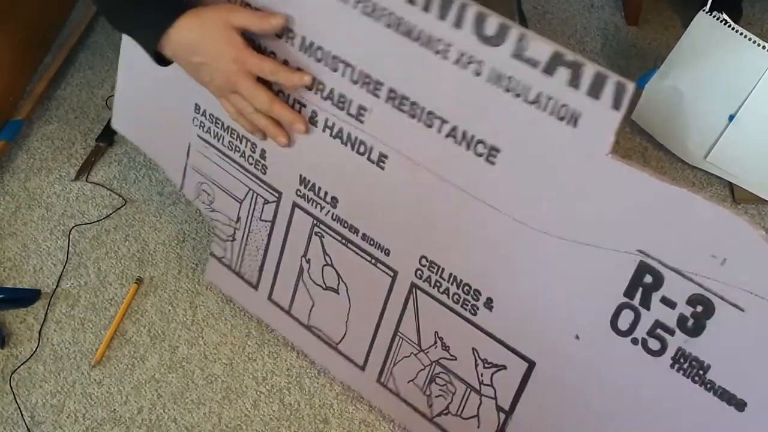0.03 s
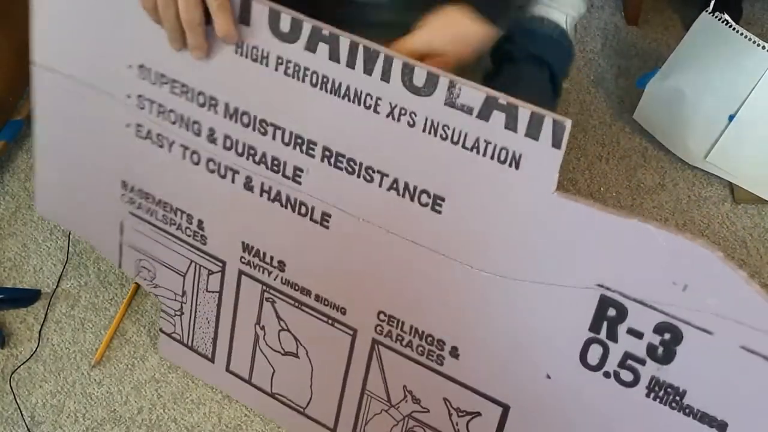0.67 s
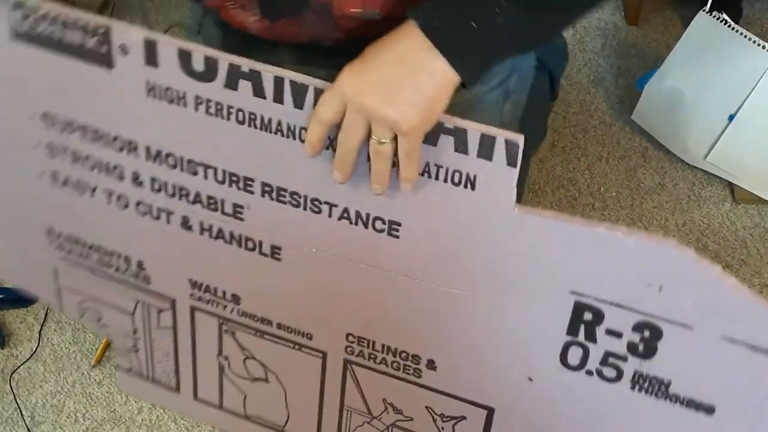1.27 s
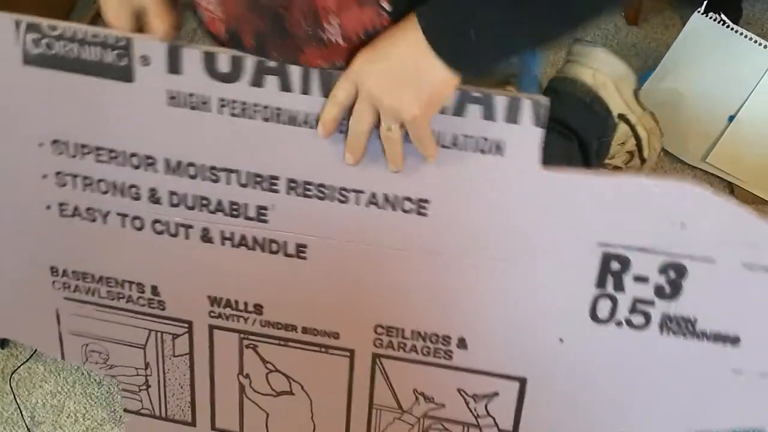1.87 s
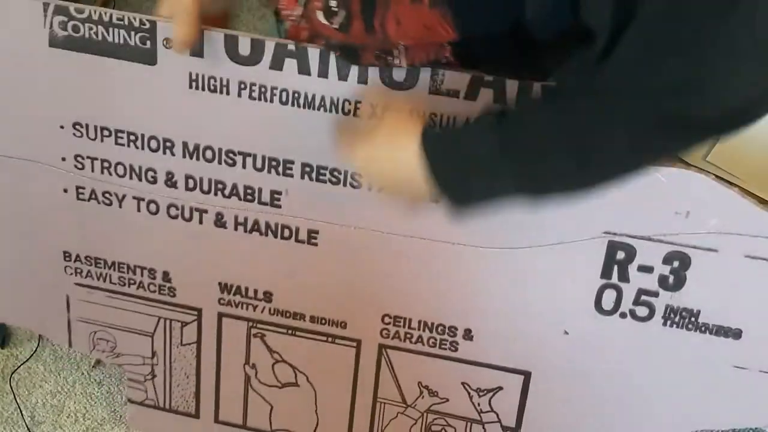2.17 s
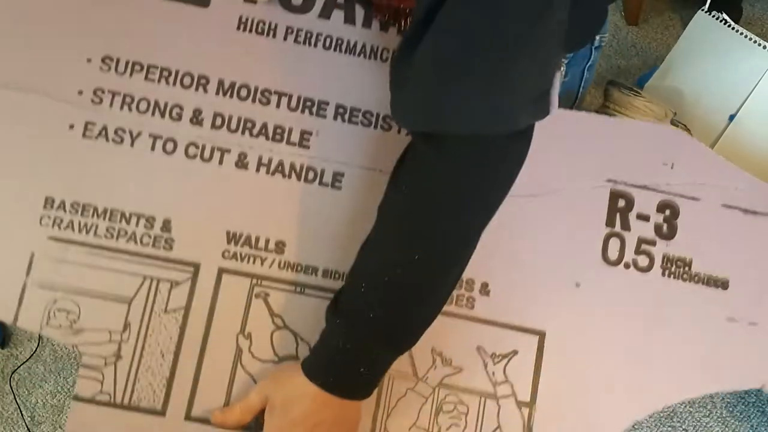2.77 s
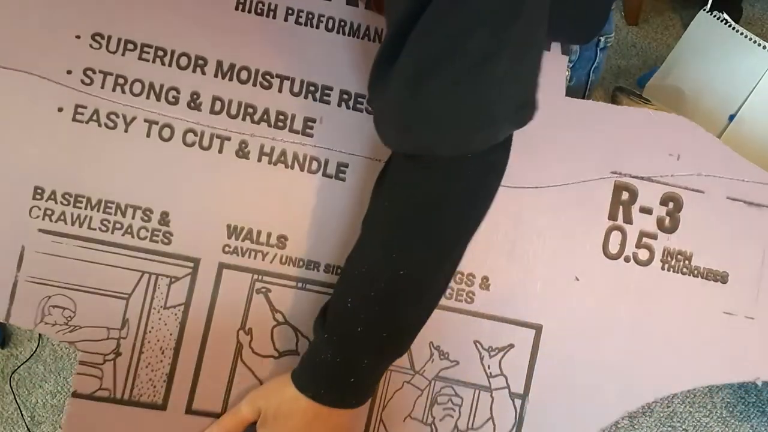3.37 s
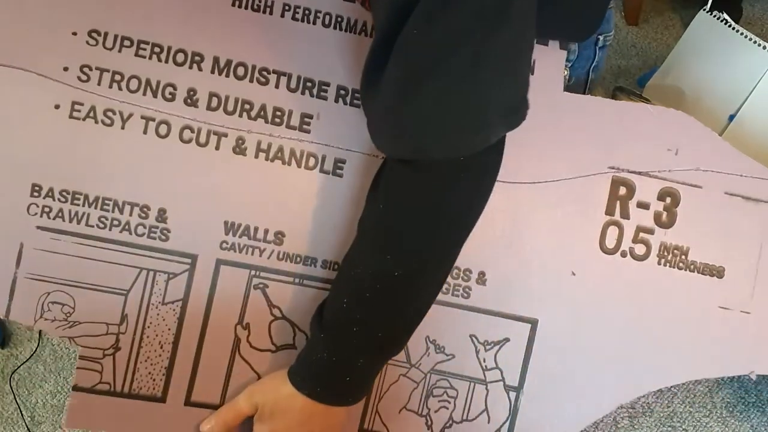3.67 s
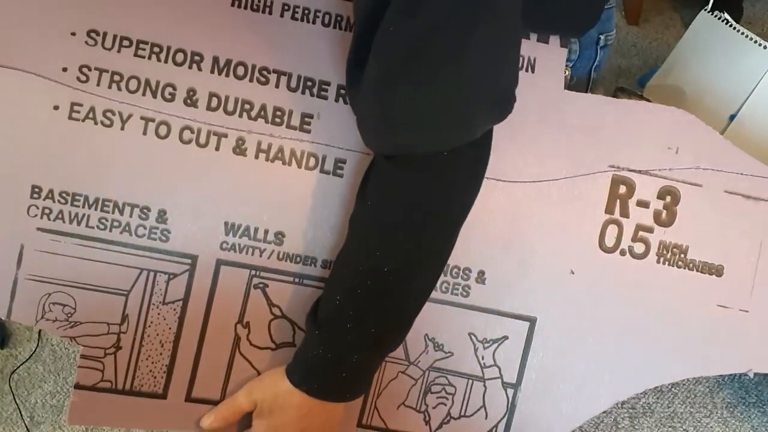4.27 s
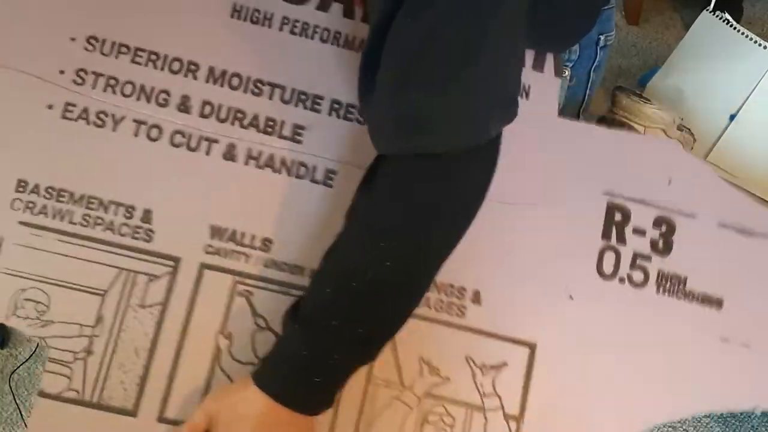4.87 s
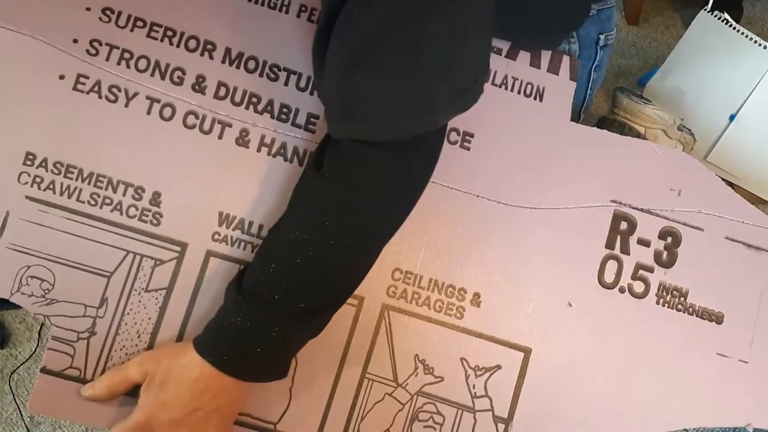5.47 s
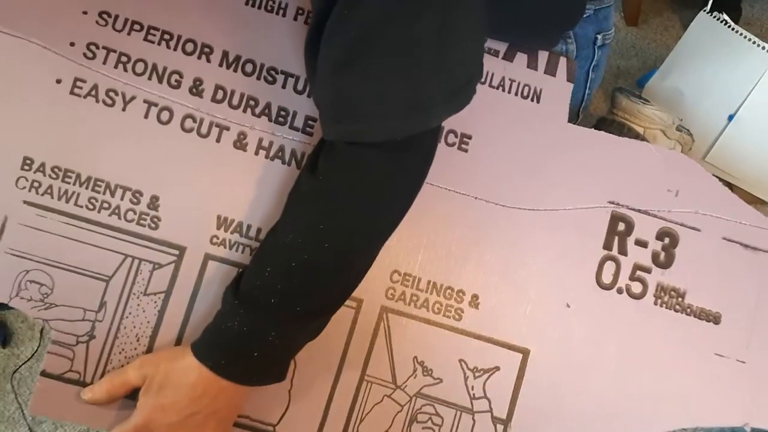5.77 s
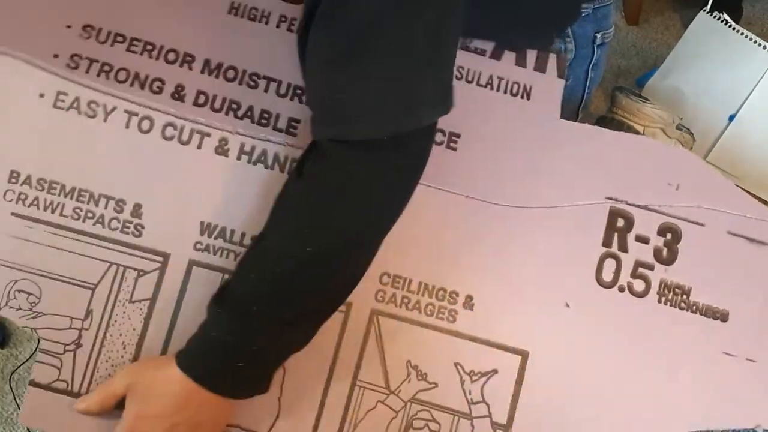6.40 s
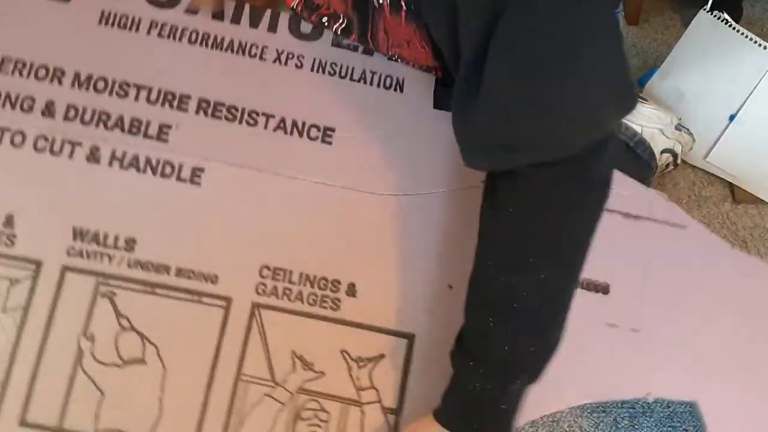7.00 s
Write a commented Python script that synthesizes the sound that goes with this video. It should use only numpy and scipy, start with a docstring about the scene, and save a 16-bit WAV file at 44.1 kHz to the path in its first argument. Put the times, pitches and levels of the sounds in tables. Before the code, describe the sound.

Hands and sleeves hiss and scuff over a foam insulation board, which drums lightly as it is bumped. A utility knife judders through it in five quick, scratchy pulls. The board is then bent, giving hollow ticks, cracks and faint squeaks amid more rubbing, until it snaps with a sharp crack and a short hollow ring. Soft rubbing follows. It sounds close, in a small, quiet room.

```python
"""Hands and sleeves hiss over a sheet of foam insulation and bump it, on a carpet in a small room.
The rubbing is countless tiny slips, and the light sheet drums along with them.
A blade then judders along a score line, sticking and jumping. The sheet is bent: it ticks
and squeaks as the foam strains and its cells give way. Near the end a faint hiss swells
and the sheet snaps in two, with a sharp crack and a short, hollow ring."""
import sys
import numpy as np
from scipy import signal
from scipy.fft import rfft, irfft
from scipy.io import wavfile

SR = 44100
rng = np.random.default_rng(int(sys.argv[2]) if len(sys.argv) > 2 else 0)


def pcm_store(signal):
    """Save signal as 16-bit PCM."""
    levels = np.round(np.clip(np.atleast_2d(signal), -1, 1) * 32767)
    wavfile.write(sys.argv[1], SR, levels.astype(np.int16).T)


N = 319284
TIME = np.arange(N) / SR
SHORT = TIME[:16384]  # the clock for one short sound, in seconds

# Swells of hiss. Most are a hand or sleeve rubbing; the one at 3.247 s is a bright scrape during
# the blade's third pull, and the one at 6.168 s is a faint hiss swelling just before the snap.
# Each row: start in seconds, length in seconds, top of the swell as a share of the length,
# hiss in dB, rasp and sizzle in dB compared with the hiss, drumming in dB.
HISS_SWELLS = [ (-0.02, 0.11, 0.76, -34, -3.5, 1.5, -39), (0.105, 0.033, 0.19, -36.5, -2, -2, -36.5),
               (0.176, 0.15, 0.28, -41, -3.5, -6.5, -48), (0.263, 0.24, 0.15, -37.5, -4.5, -6.5, -41),
               (0.47, 0.033, 0.92, -34.5, -2.5, -4.5, -40.5), (0.51, 0.08, 0.19, -50.5, 4, -12, -42.5),
               (0.602, 0.17, 0.43, -41.5, 2.5, -7, -38.5), (0.79, 0.17, 0.62, -42, 0, -8, -41.5),
               (0.986, 0.079, 0.55, -40.5, -5.5, -7.5, -41.5), (1.107, 0.16, 0.61, -38, -4, -4.5, -42),
               (1.275, 0.043, 0.85, -42.5, 0.5, -9, -40.5), (1.34, 0.2, 0.91, -60.5, 8, -20, -45.5),
               (1.433, 0.14, 0.13, -47, 2.5, -7, -42), (1.603, 0.077, 0.57, -41.5, 4, -11, -31.5),
               (1.718, 0.16, 0.18, -39, 0.5, -10.5, -38), (1.884, 0.11, 0.63, -35, -2.5, -9.5, -40),
               (1.997, 0.15, 0.6, -38.5, -1, -6, -47.5), (2.137, 0.14, 0.64, -35, -2, -8, -36),
               (2.327, 0.067, 0.76, -42, -3, -6, -44), (2.384, 0.062, 0.3, -39.5, 5, -6, -32.5),
               (2.443, 0.14, 0.75, -34, 1, -10, -34.5), (2.591, 0.16, 0.59, -32.5, -1.5, -6, -32.5),
               (2.765, 0.16, 0.18, -35.5, 0.5, -8.5, -27), (3.247, 0.082, 1, -36, -4, -5.5, -40),
               (3.786, 0.036, 1, -52, -6, -10, -43.5), (3.869, 0.12, 0.4, -63, 4.5, -9, -50),
               (4.093, 0.086, 0.85, -53.5, 5, -10, -40), (4.192, 0.13, 0.77, -57.5, 2, -7, -40.5),
               (4.377, 0.041, 0.72, -50.5, 0.5, -11, -40), (4.508, 0.14, 0.47, -35, 2, -7, -24.5),
               (4.625, 0.056, 0.99, -28, -9, -3, -48), (4.723, 0.067, 0.19, -34, 0, -3.5, -31),
               (4.831, 0.25, 0.95, -31.5, -0.5, -8.5, -28), (5.082, 0.052, 0.23, -29.5, -3, -7, -26.5),
               (5.187, 0.095, 0.51, -36, 4, -6.5, -27.5), (5.325, 0.077, 0.32, -32.5, -3, -11.5, -28),
               (5.444, 0.085, 0.12, -51, 0.5, -1, -35), (5.564, 0.37, 0.23, -54, -3.5, -3, -50),
               (5.957, 0.31, 0.46, -52, -7.5, -1.5, -79), (6.168, 0.067, 1, -43, -4.5, -1.5, -47),
               (6.481, 0.2, 1, -40, -2.5, -12, -41.5), (6.681, 0.17, 0.71, -36, -5, -10.5, -46.5),
               (6.815, 0.16, 0.75, -43.5, -0.5, -8.5, -46), (6.956, 0.31, 0.21, -40, -4.5, -3.5, -45),
               (7.113, 0.13, 0.63, -39.5, 2, -7.5, -39.5), ]
# Pulls of the blade. Each row: start in seconds, length in seconds, fastest moment as a share
# of the length, judder in dB, scratch in dB.
BLADE_PULLS = [(2.958, 0.11, 0.1, -26.5, -39.5), (3.122, 0.099, 0.75, -23, -38.5),
               (3.246, 0.12, 0.1, -25.5, -39), (3.37, 0.079, 0.83, -30.5, -38),
               (3.516, 0.17, 0.79, -38, -48)]
# Cells giving way. Each row: start in seconds, level in dB, extra bass in dB, extra crumbling in dB.
CELL_CRACKS = [(0.288, -16.5, -7.5, 3), (0.674, -15.5, -5, 0), (1.628, -16.5, 5, 4), (1.648, -22, -1, -1),
               (2.784, -21.5, -2, 5), (2.907, -15, -6, 4), (2.98, -19.5, 6, 8), (2.999, -21, 9.5, -8),
               (3.037, -17.5, 2, -1), (3.063, -20, 5, 7), (3.125, -23.5, -2, 12), (3.26, -23, 6, 17.5),
               (3.416, -18.5, 5, 4), (3.554, -29.5, 9, -3), (3.698, -34, 10.5, 15), (3.785, -45, 17, 1),
               (3.9161, -13, -4.5, -2), (3.996, -31.5, -15, 1), (4.074, -12.5, -2, 2), (4.152, -21, 3, 2.5),
               (4.1951, -10.5, 0, -1), (4.336, -22, -25, 5), (4.3632, -17, 0, 1), (4.5, -35, 1, 3),
               (4.514, -10, -6, 3.5), (4.5675, -5.5, -4, 4.5), (4.5874, -4, -22, 0), (4.609, -12, -15, 5),
               (4.641, -17, 4, 1), (4.851, -13, -2, -6), (4.982, -10, 1.5, 11), (5.21, -14.5, 2, 2),
               (5.285, -14.5, -3, 9.5), (5.325, -28, 13, -2), (5.372, -22, 12.5, -3),
               (5.464, -18, -20, 7.5), (5.535, -34.5, 8.5, 16), (5.603, -39.5, 11, -4),
               (6.3415, -11, 0, -4), (6.393, -20, -13, 3), (6.416, -24, 2, 1.5)]
# The piece breaking off. Each row: start in seconds, relative crack and ring levels in dB.
BREAKS = [(6.2311, -0.5, 0.5), (6.2591, -8.5, -8)]
# Tones of the freed piece. Each row: pitch in Hz, relative level in dB, fade time in seconds.
# A fade time (t60 in the code) is how long a sound takes to drop by 60 dB.
PIECE_TONES = [(93, -11, 0.2), (123, -24, 0.14), (164, -31, 0.17), (200, -12, 0.11), (236, -9.5, 0.49),
               (321, 0.5, 0.096), (422, -9, 0.074), (458, -4, 0.083), (489, 0, 0.12), (521, -10.5, 0.32),
               (630, -34, .1), (920, -34, 0.065), (1480, -20, 0.054), (2660, -20, 0.046)]
# Soft bumps. Each row: start in seconds, relative level in dB, base pitch in Hz, fade time in seconds.
BUMPS = [(0.289, -17, 81, 0.082), (0.535, -28.5, 70, 0.17), (0.666, -20, 249, 0.13),
         (1.494, -22.5, 79, 0.038), (1.61, -23.5, 126, 0.079), (1.628, -29, 162, 0.12),
         (1.736, -18, 139, 0.03), (1.762, -18, 104, 0.061), (1.842, -19.5, 128, 0.051),
         (2.152, -25, 121, 0.14), (2.538, -7.5, 196, 0.054), (2.553, -10, 215, 0.09),
         (4.856, -9, 98.6, 0.13), (4.925, -16, 98, 0.16), (5.092, 1, 87.5, 0.076)]
# Tones of the bumped sheet. Each row: multiple of the base pitch, relative level in dB.
BUMP_TONES = [(.7, -3.5), (1.12, 6), (1.6, -3), (2.4, -5.5), (3.7, -16.5)]
# Catches of skin or cloth, then squeaks of foam.
# Each row: start in seconds, peak level in dB, centre pitch in Hz, fade time in seconds.
CATCHES = [(0.034, -20.5, 9400, 0.1), (0.049, -16.5, 8900, 0.067), (0.115, -23, 9500, .09),
           (0.198, -34, 3380, 0.082), (0.291, -36, 1300, 0.06), (0.494, -23, 10800, 0.06),
           (0.935, -32, 7100, 0.25), (1.01, -26.5, 6540, 0.16), (1.451, -27.5, 6700, 0.043),
           (1.646, -25, 5460, 0.023), (1.738, -24, 3440, 0.018), (2.392, -20.5, 3360, 0.024),
           (2.395, -23, 6960, 0.024), (2.411, -22, 7000, 0.015), (2.456, -21, 6040, 0.023),
           (2.458, -25.5, 1670, 0.072), (2.537, -20.5, 6160, 0.084), (3.258, -28.5, 1940, 0.11)]
FOAM_SQUEAKS = [(0.872, -31, 1710, 0.16), (2.215, -30, 2160, 0.21), (4.109, -38, 11800, 0.0095),
                (4.186, -42, 11800, 0.0098), (4.229, -34, 9700, .012), (4.272, -31, 9350, 0.015),
                (5.94, -48, 3400, 0.0085), (5.95, -42, 3360, 0.0071), (5.96, -39, 3300, 0.0081),
                (5.973, -42, 3340, 0.01), (6.673, -32, 1700, 0.2)]
# The tone colour of each sound. Each row: frequency in Hz, relative strength in dB.
HISS_SPECTRUM = [(290, 4), (500, 22), (807, 1), (960, 2), (1050, 0.5), (1280, 0), (1840, -2.5),
                 (2190, -6.5), (2360, -11), (2930, -10), (7000, -14.5), (10800, -21.5), (12000, -22.5),
                 (14500, -26), (16000, -28)]
DRUM_SPECTRUM = [(21, -79), (35, 0), (59, 1), (97, 0.5), (150, -1), (243, -1), (281, -3), (312, 1.5),
                 (374, -7.5), (416, -4), (540, -9.5), (592, -7.5), (800, -30), (1040, -44), (1760, -120)]
JUDDER_SPECTRUM = [(26, -88), (45, -1), (91, 2), (139, 6), (179, 7), (213, -5), (270, 6.5), (372, -5.5),
                   (464, 0.5), (613, -13.5), (810, -18.5), (1170, -44), (1500, -31), (1950, -52),
                   (3300, -120)]
SCRATCH_SPECTRUM = [(530, -14), (900, 2.5), (2890, -3.5), (3110, -3), (7680, -11.5), (8660, -16),
                    (9530, -16.5), (13000, -24), (16000, -28)]
CRACK_SPECTRUM = [(29, -65), (50, -13.5), (177, 4.5), (346, -3), (483, -2), (643, -11), (1310, -20),
                  (1520, -24.5), (1710, -16), (2120, -30), (3030, -29.5), (5250, -56), (5910, -58),
                  (7510, -66), (15000, -85)]
SNAP_SPECTRUM = [(300, -33), (700, 0), (1200, -2.5), (2000, -10.5), (2800, 0), (3700, -3), (4900, -4.5),
                 (7500, -13), (10000, -18), (13500, -24), (16000, -29)]
BACKGROUND_SPECTRUM = [(30, 3), (60, 12), (125, -4), (300, -1.5), (520, -6), (800, -24), (2500, -21.5),
                       (7000, -24), (16000, -34)]


def hissing(crunch_db=-11, thrum_hz=140, thrum_db=1, thrum_per_db=0.29):
    """Swells of hiss and drumming, mostly skin and cloth slipping over cells and crushing a few."""
    grip = undb(1.33 * wobble(90))  # tightens and loosens many times a second
    friction = colour(slips(per_second=9000, spread_db=1) * grip, HISS_SPECTRUM)
    grains = ringing_patches(friction)
    rasp = unit(band(grains, [720, 2500], "bandpass", order=3))
    hiss = unit(band(grains, [2450, 7700], "bandpass", order=4))
    sizzle = unit(band(grains, 8320, "highpass", order=5))
    drum = colour(slips(per_second=590, spread_db=4.5) * grip, DRUM_SPECTRUM)
    crushed_cells = bending_wave(slips(per_second=170, spread_db=2.5), travel_s=0.0015)
    crunch = undb(crunch_db) * colour(crushed_cells, SCRATCH_SPECTRUM)
    *_, hiss_db, rasp_db, sizzle_db, drum_db = np.transpose(HISS_SWELLS)
    # only a firm touch moves the whole sheet, so the deep thrum fades when the hiss is soft
    thrum = band(drum, thrum_hz, "lowpass", order=1)
    deep_db = drum_db + thrum_db + thrum_per_db * (hiss_db - hiss_db.mean())
    return (hiss * stroke_gain(HISS_SWELLS, hiss_db, swell_db=7)
            + (rasp + crunch) * stroke_gain(HISS_SWELLS, hiss_db + rasp_db, swell_db=6.5)
            + sizzle * stroke_gain(HISS_SWELLS, hiss_db + sizzle_db, swell_db=8)
            + (drum - thrum) * stroke_gain(HISS_SWELLS, drum_db, swell_db=4, release_t60=0.29)
            + thrum * stroke_gain(HISS_SWELLS, deep_db, swell_db=4, release_t60=0.24))


def ringing_patches(friction, count=420, ring_db=1, width=0.062, length_s=0.2):
    """As the contact moves, patch after patch of the sheet rings briefly at a pitch of its own."""
    out = friction.copy()
    window = signal.windows.hann(int(length_s * SR))
    for when, pitch in rng.random((count, 2)):
        start = when * (N - len(window)) / SR
        hz = 800 * 14 ** pitch
        patch = friction[int(start * SR):][:len(window)]
        ring = signal.lfilter(*signal.iirpeak(hz, 1 / width, fs=SR), patch)
        add(out, start, undb(ring_db) * window * ring)
    return out


def cutting(jumps_per_second=120, jitter=.45, puff_t60=0.05, steady_scratch=0.64):
    """The blade sticks and jumps; each jump kicks the sheet and crushes a few cells."""
    *_, judder_db, scratch_db = np.transpose(BLADE_PULLS)
    gaps, sizes = rng.standard_normal((2000, 2)).T
    at = (np.cumsum(np.exp(jitter * gaps)) * SR / jumps_per_second).astype(int)
    jumps = np.zeros(N)
    jumps[at[at < N]] = undb(2.5 * np.clip(sizes[at < N], -2, 2))
    crushing = steady_scratch + unit(signal.fftconvolve(jumps, fade(puff_t60))[:N])
    scratch = colour(crushing * rng.standard_normal(N), SCRATCH_SPECTRUM)
    judder = colour(bending_wave(jumps, travel_s=0.00071), JUDDER_SPECTRUM)
    pull = dict(swell_db=3.5, attack_s=0.0038, release_t60=0.19)  # the blade bites, runs and stops
    return (judder * stroke_gain(BLADE_PULLS, judder_db, **pull)
            + scratch * stroke_gain(BLADE_PULLS, scratch_db, **pull))


def snapping(crack_s=0.0034, tear_db=-25, tear_t60=0.31, rattle_db=-32, rattle_t60=0.23, recoil_db=-6):
    """The break races along the score; the sheet springs back, the halves ring, the edges splinter."""
    out, n = np.zeros(N), len(SHORT)
    tones = sum(undb(db) * np.cos(2 * np.pi * hz * SHORT) * fade(t60) for hz, db, t60 in PIECE_TONES)
    tones = bending_wave(band(tones, 3200, "lowpass"), travel_s=0.00116)
    thud = band(click(CRACK_SPECTRUM), 830, "lowpass")
    recoil = peak(bending_wave(thud, travel_s=0.001396), recoil_db)
    for start, crack_db, ring_db in BREAKS:
        fracture = rng.standard_normal(n) * np.exp(-(SHORT / crack_s) ** 2)
        splinters = slips(per_second=1500, spread_db=7)[:n] * undb(tear_db) * fade(tear_t60)
        crack = signal.fftconvolve(fracture + splinters, click(SNAP_SPECTRUM))[:n]
        # the broken edges keep knocking together, which roughens the ring
        rattle = slips(per_second=820, spread_db=2)[:n] * undb(rattle_db) * fade(rattle_t60)
        ring = tones + signal.fftconvolve(rattle, tones)[:n]
        add(out, start, peak(crack, crack_db + 3) + undb(ring_db - 9.5) * ring + recoil)
    return out


def cracking(crumble_db=-17, crumble_t60=0.033, crumble_rise_s=0.00054):
    """A row of cells lets go: one hollow, falling 'tock' of the sheet with a little crumbling."""
    out = np.zeros(N)
    dull_click = band(click(CRACK_SPECTRUM), 2700, "lowpass")
    tock = peak(bending_wave(dull_click, travel_s=0.00029), 0)
    bass = band(tock, 360, "lowpass", order=1)
    crumble_shape = fade(crumble_t60) * rise(crumble_rise_s)
    for start, db, bass_db, extra_crumble_db in CELL_CRACKS:
        noise = band(rng.standard_normal(len(SHORT)), [900, 4500], "bandpass", order=1)
        crumbs = peak(band(noise, 9300, "lowpass") * crumble_shape, crumble_db + extra_crumble_db)
        add(out, start, undb(db) * (tock - bass + undb(bass_db) * bass + crumbs))
    return out


def bumping(contact_s=0.0048, sag=0.57, sag_s=0.067):
    """A soft blow makes the sheet flex to and fro; the pitch sags as the slowest waves arrive."""
    out = np.zeros(N)
    slowing_clock = (1 - sag) * SHORT + sag * sag_s * rise(sag_s)
    for start, db, hz, t60 in BUMPS:
        swing = sum(undb(tone_db) * np.sin(2 * np.pi * hz * ratio * slowing_clock)
                    * fade(t60 / np.sqrt(ratio)) for ratio, tone_db in BUMP_TONES)
        add(out, start, peak(swing * rise(contact_s), db - 1.5))
    return out


def scuffing(width=0.22, rise_s=0.00017):
    """Skin and cloth catch on the surface in short, bright bursts."""
    out = np.zeros(N)
    for start, db, hz, t60 in CATCHES:
        add(out, start, peak(noise_around(hz, width) * fade(t60) * rise(rise_s), db))
    return out


def squeaking(width=0.12, rise_share=0.016):
    """Foam slips against foam or skin in brief, thin squeaks."""
    out = np.zeros(N)
    for start, db, hz, t60 in FOAM_SQUEAKS:
        add(out, start, peak(noise_around(hz, width) * fade(t60) * rise(rise_share * t60), db))
    return out


def room(x, echo_db=-11, low_t60=0.24, high_t60=0.29, first_echo_s=0.00131):
    """A small furnished room adds a weak, short wash of echoes."""
    noise = rng.standard_normal(len(SHORT))
    low = band(noise, 1350, "lowpass", order=1)
    tail = (low * fade(low_t60) + 0.82 * (noise - low) * fade(high_t60)) * (SHORT > first_echo_s)
    tail /= np.sqrt(np.sum(fade(low_t60) ** 2))
    return x + undb(echo_db) * signal.fftconvolve(x, tail)[:N]


def background(level_db=-53):
    """The faint, steady rumble and hiss of the quiet room."""
    return colour(rng.standard_normal(N), BACKGROUND_SPECTRUM) * undb(level_db)


def stroke_gain(strokes, levels_db, swell_db, attack_s=0.017, release_t60=0.22):
    """Loudness over time: each sound sets in, swells by swell_db and dies away."""
    power = np.zeros(N)
    for (start, length, top, *_), db in zip(strokes, levels_db):
        t = TIME[:SR // 2] - min(start, 0)
        swell = np.interp(t / length, [0, np.clip(top, .01, .99), 1], [0, 1, 0])
        attack = np.minimum(t / attack_s, 1)
        release = np.exp(-np.log(1000) * np.maximum(t - length, 0) / release_t60)
        add(power, start, (undb(db + swell_db * (swell - 1)) * attack * release) ** 2)
    return np.sqrt(power)


def bending_wave(x, travel_s):
    """High pitches cross the sheet before low ones; travel_s is the delay at 1000 Hz."""
    hz = np.arange(len(x) // 2 + 1) * SR / len(x)
    return irfft(rfft(x) * np.exp(-4j * np.pi * travel_s * np.sqrt(1000 * hz)))


def slips(per_second, spread_db):
    """Tiny slips at random moments, in either direction and of uneven size."""
    happens = rng.random(N) < per_second / SR
    direction = rng.choice([-1, 1], N)
    size = undb(spread_db * np.clip(rng.standard_normal(N), -2, 2))
    return unit(happens * direction * size)


def wobble(per_second):
    """A value that slides from one random number to the next."""
    points = rng.standard_normal(4096)
    return 1.2 * np.interp(TIME * per_second, np.arange(len(points)), points)


def noise_around(hz, width):
    """A short noise near one pitch; a smaller width sounds more like a note."""
    return band(rng.standard_normal(len(SHORT)), [hz / (1 + width), hz * (1 + width)], "bandpass")


def click(spectrum):
    """A single click with the given tone colour."""
    hz, db = np.transpose(spectrum)
    n = len(SHORT)
    grid_hz = np.maximum(np.arange(n // 2 + 1) * SR / n, 1)
    gains = undb(np.interp(np.log(grid_hz), np.log(hz), db))
    # folding the second half onto the first packs the energy at the start of the click
    folded = irfft(np.log(gains))
    folded[1:n // 2] *= 2
    folded[n // 2 + 1:] = 0
    return irfft(np.exp(rfft(folded)))


def colour(x, spectrum):
    """Give a sound a tone colour, at an average level of 1."""
    return unit(signal.fftconvolve(x, click(spectrum))[:N])


def band(x, hz, kind, order=2):
    """Keep the lows, the highs or a band between; a higher order cuts more sharply."""
    return signal.sosfilt(signal.butter(order, np.minimum(hz, .45 * SR), kind, fs=SR, output="sos"), x)


def rise(seconds):
    """Climb from 0 towards 1, about two thirds of the way in the given time."""
    return 1 - np.exp(-SHORT / seconds)


def fade(t60):
    """Die away by 60 dB in t60 seconds."""
    return np.exp(-np.log(1000) * SHORT / max(t60, 1e-3))


def undb(db):
    """Turn decibels into a number to multiply by."""
    return 10 ** (np.asarray(db) / 20)


def unit(x):
    """Scale to an average (rms) level of 1."""
    return x / np.sqrt(np.mean(x ** 2))


def peak(x, db):
    """Scale so the highest peak is at db."""
    return x * undb(db) / np.abs(x).max()


def add(out, start, x):
    """Mix a sound in at a start time in seconds."""
    i = max(int(start * SR), 0)
    out[i:i + len(x)] += x[:N - i]


def scene():
    """Everything the sheet does, over the quiet of the room; the same in both ears."""
    sheet = hissing() + cutting() + cracking() + scuffing() + squeaking() + bumping() + snapping()
    quiet = background()
    return np.tile(room(sheet) + quiet, (2, 1))


def record(dry, bottom_hz=46, top_hz=15900):
    """Drop the deepest bass, round off the loudest peaks and cut the highest treble."""
    lean = band(dry, bottom_hz, "highpass", order=4)
    rounded = .95 * lean / (1 + lean ** 4) ** .25
    return signal.sosfilt(signal.ellip(10, .2, 80, top_hz, fs=SR, output="sos"), rounded)


dry = scene()
out = record(dry)
pcm_store(out)
```